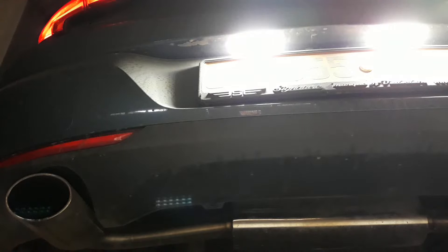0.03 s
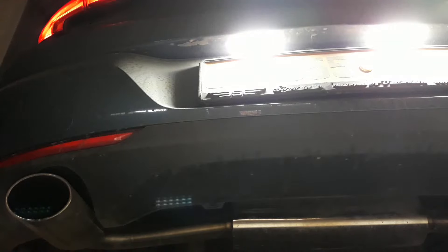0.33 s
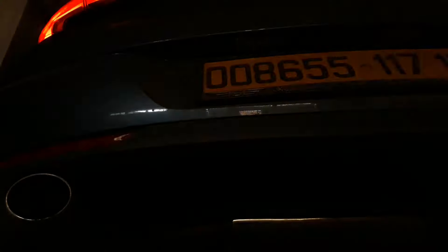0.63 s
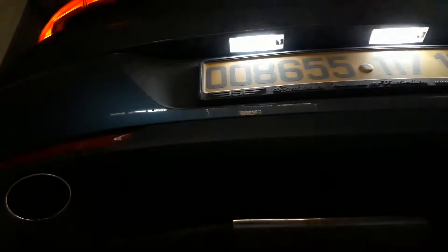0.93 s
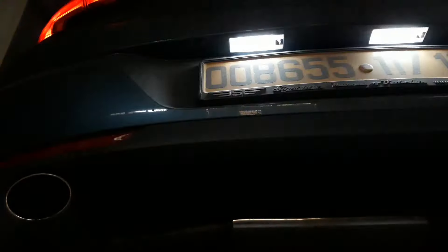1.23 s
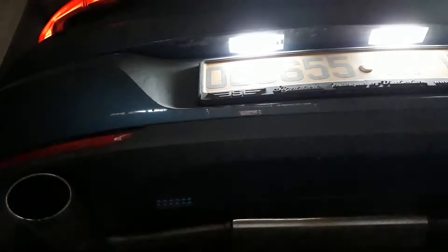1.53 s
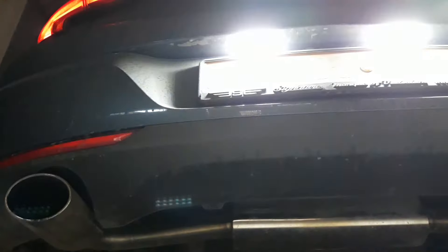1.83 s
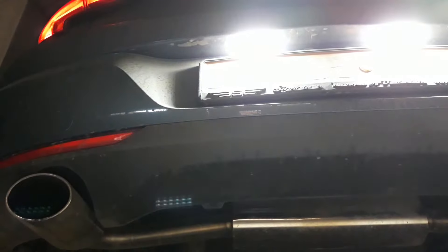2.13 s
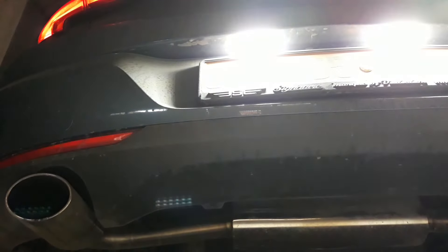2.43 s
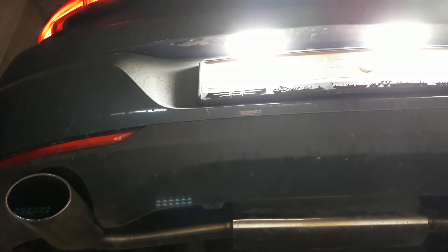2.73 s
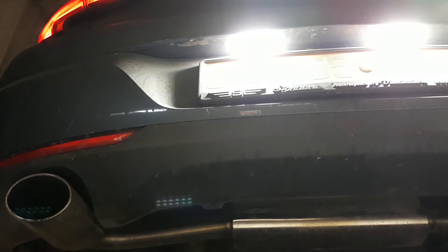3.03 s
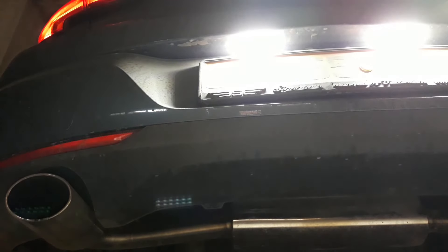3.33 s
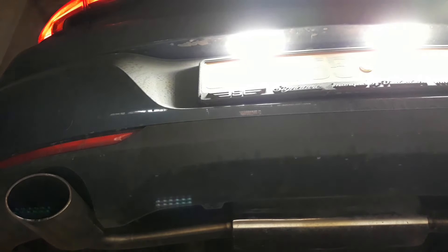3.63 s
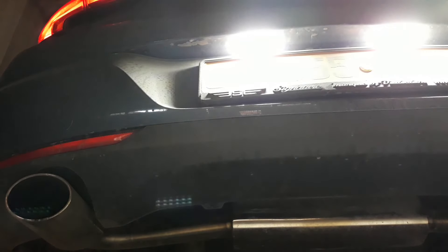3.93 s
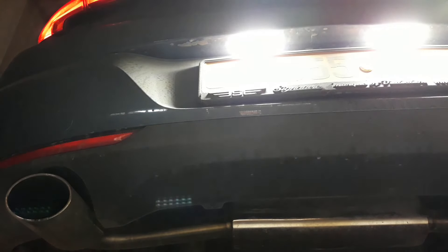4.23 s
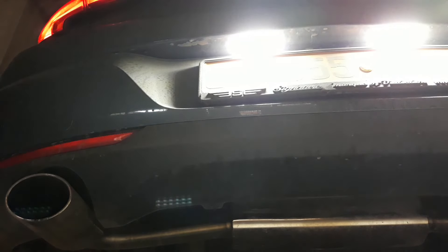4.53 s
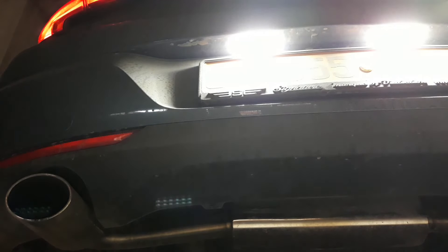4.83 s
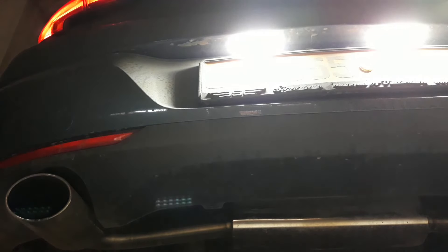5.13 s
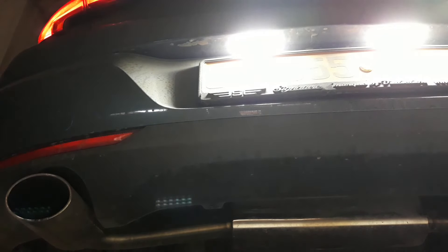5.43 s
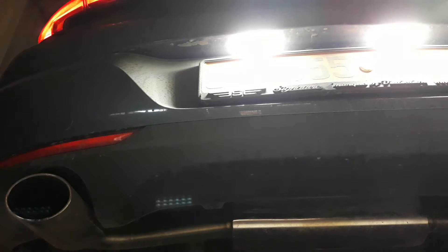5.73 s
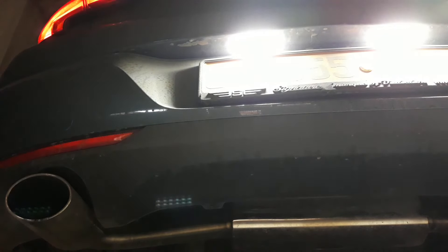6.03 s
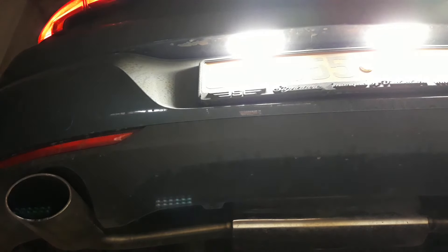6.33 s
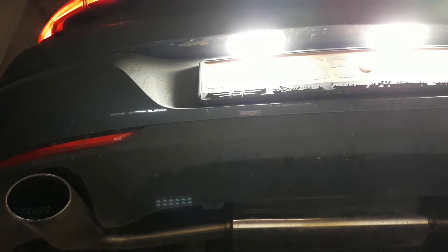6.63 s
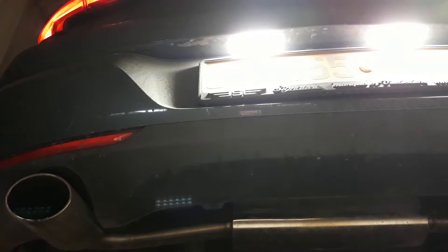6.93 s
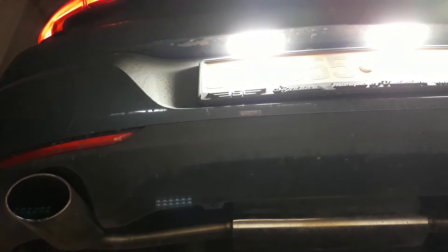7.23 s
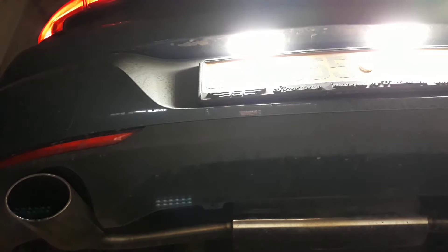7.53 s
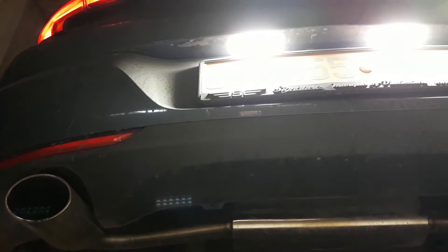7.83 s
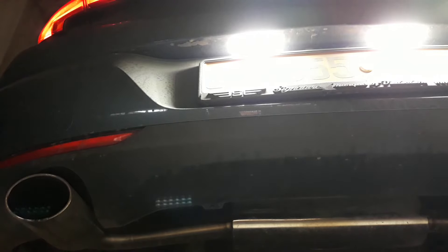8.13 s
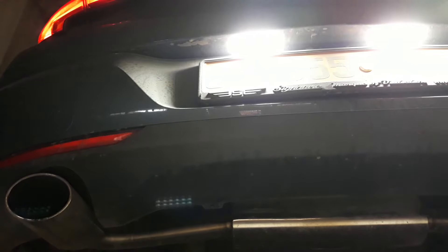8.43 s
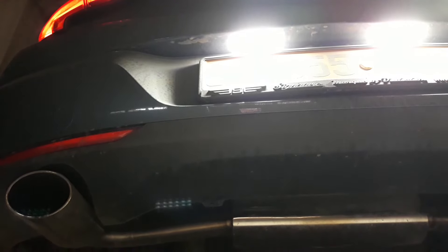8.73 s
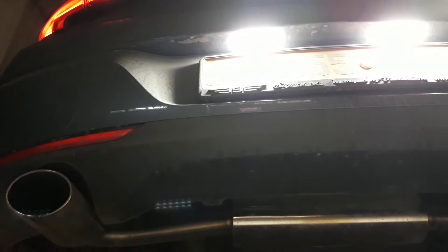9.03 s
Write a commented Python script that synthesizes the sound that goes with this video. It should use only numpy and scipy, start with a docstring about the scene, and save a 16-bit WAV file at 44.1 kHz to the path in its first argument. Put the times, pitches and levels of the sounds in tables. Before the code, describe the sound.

A faint, low outdoor hum opens the scene, heard from just behind a car's tailpipe. At about 0.6 seconds the starter engages with a clack, then grinds and whines through five quick cranking pulses. Around 1.4 seconds the cold four-cylinder engine catches with ragged, deep thumps and sharp spits of gas, and the starter spins away. A short, loud flare peaks between 1.6 and 2 seconds and falls back by about 2.4 seconds. The engine then holds a fast, low idle, the exhaust thumping and burbling over a soft rush of gas and light clatter. Faint, thin whistles come and go, mostly between 2 and 6 seconds. Small pops come from the pipe, the clearest near 3 and 5.8 seconds, with weaker ones around 7.5. The idle sinks very slightly and keeps running to the end, at about 9 seconds.

```python
"""Cold car start at night

A four-cylinder petrol engine outdoors, heard from just behind the tailpipe. The solenoid clacks,
the starter grinds through five compressions, the cylinders catch one by one and flare. A fast idle
then sinks slowly: every firing thumps the silencer, barks down the pipe and puffs out gas."""
import sys
import numpy as np
from scipy import signal
from scipy.fft import rfft, irfft
from scipy.io import wavfile
from scipy.ndimage import uniform_filter1d

SR = 44100
rng = np.random.default_rng(int(sys.argv[2]) if len(sys.argv) > 2 else 0)


def persist_wave(psi):
    """Save psi, clipped to +-1, as 16-bit WAV."""
    counts = np.round(np.clip(psi, -1, 1) * 32767).astype(np.int16)
    wavfile.write(sys.argv[1], SR, np.atleast_2d(counts).T)


N = 404838
T = np.arange(N) / SR
HZ = np.maximum(np.arange(16385) * SR / 32768, 1)  # filter frequency grid

# Compressions that load the starter. Each row: start in seconds, length in seconds, load in dB.
COMPRESSIONS = [(.83, .12, 3), (.975, .085, 5.5), (1.11, .075, 5.5), (1.218, .075, 7.5), (1.335, .075, 6.5)]
# Air pumped by the cranking pistons, then the first ragged firings.
# Each row: time in seconds, thump and bark in relative dB.
FIRST_PULSES = [(.69, -24, -45), (.905, -11.5, -27), (1.419, -11, -18.5), (1.46, 8, -7.5),
                (1.498, -5, -8.5), (1.536, -7, -24), (1.571, 5, 0), (1.605, 3, -4.5), (1.627, 0, -18),
                (1.660, 0, -1), (1.689, 2, -0.5), (1.723, 7, -11), (1.747, 3, -2.5), (1.771, 7, -1.5),
                (1.799, 12, 2), (1.822, 11, -2)]


def undb(db):
    """Decibels to gain."""
    return 10 ** (np.asarray(db) / 20)


def unit(x):
    """Scale to rms 1."""
    return x / np.sqrt(np.mean(x ** 2))


def ramp(start_s, rise_s):
    """Linear rise from 0 to 1, then held."""
    return np.clip((T - start_s) / rise_s, 0, 1)


def curves(rows, at_s=T):
    """Interpolate each column over the times in the first."""
    row_s, *columns = np.transpose(rows)
    return [np.interp(at_s, row_s, column) for column in columns]


def colour(points):
    """Gain over frequency from (Hz, dB) points, rolled off below the first."""
    hz, db = np.transpose(points)
    return undb(np.interp(np.log(HZ), np.log(hz), db)) * HZ ** 2 / (HZ ** 2 + (hz[0] / 2) ** 2)


def resonances(modes):
    """Gain over frequency of steep-sided (Hz, width Hz, dB) peaks."""
    return np.sqrt(sum((undb(db) / (1 + (2 * (HZ - hz) / width) ** 2)) ** 2 for hz, width, db in modes))


def ring(x, gain, delay_s=0):
    """Minimum-phase filter, plus a delay per frequency."""
    cepstrum = irfft(np.log(gain + 1e-6))
    half = len(cepstrum) // 2
    cepstrum[1:half] *= 2
    cepstrum[half + 1:] = 0
    lag_rad = 2 * np.pi * np.cumsum(delay_s * np.gradient(HZ))
    response = irfft(np.exp(rfft(cepstrum) - 1j * lag_rad))[:half]
    return signal.fftconvolve(x, response)[:N]


def walk(rate_hz):
    """Smooth random curve, rms 1."""
    step = max(int(SR / rate_hz), 1)
    held = np.repeat(rng.standard_normal(N // step + 1), step)[:N]
    return unit(uniform_filter1d(held, step))


def noise(gain, grit_db=0):
    """Coloured noise, rms 1; grit breaks it into uneven grains."""
    return unit(ring(rng.standard_normal(N) * undb(grit_db * walk(900)), gain))


def pulses(times_s, sizes):
    """One impulse per event."""
    return np.bincount(np.clip(times_s * SR, 0, N).astype(int), sizes, N + 1)[:N]


def bursts(rows, rise_s=0.0014):
    """Envelope of sudden, decaying blows."""
    return sum(undb(db) * ramp(s, rise_s) * np.exp(-np.abs(T - s) / decay_s) for s, db, decay_s in rows)


def swells(kicks, decay_s, rise_s=0.0012):
    """Envelope with a quick rise and a decay per kick."""
    t = T[:SR // 10]
    shape = (1 - np.exp(-(t / rise_s) ** 2)) * np.exp(-t / decay_s)
    return signal.fftconvolve(kicks, shape)[:N]


def night_hum(level_db=-41):
    """Low outdoor background, wavering slightly."""
    # Each row: frequency in Hz, gain in dB.
    spectrum = [(18, -53), (30, -23), (47, -12), (83, -4), (154, 0), (253, -5), (404, -2), (698, -3),
                (859, -5), (953, -4), (2370, -16), (5730, -48), (15000, -55)]
    return undb(level_db + 0.5 * walk(9.5)) * noise(colour(spectrum))


def solenoid():
    """The solenoid clicks; the pinion strikes and rebounds."""
    # Each row: start in seconds, level in dB, decay in seconds.
    clacks = [(.639, -22.5, 0.066), (.665, -14.5, 0.027), (.675, -19, 0.013)]
    # Each row: frequency in Hz, gain in dB.
    spectrum = [(59, -49), (100, -8), (279, -12.5), (391, -1), (513, -20), (780, 1), (983, -7), (1190, -1),
                (1430, -21), (1590, -7.5), (15000, -39)]
    return bursts(clacks) * noise(colour(spectrum), grit_db=1.0)


def mesh_pitch(on_s, free_s, free_rise_s, start_hz=750, top_hz=3750, spin_up_s=0.18, free_rise_hz=1500):
    """Gear-mesh Hz: the motor spins up, sags late in each compression and races once freed."""
    sag_share, sag_width_s = 0.17, 0.032
    cranking_hz = top_hz - (top_hz - start_hz) * np.exp(-np.maximum(T - on_s, 0) / spin_up_s)
    racing_hz = free_rise_hz * (1 - np.exp(-np.maximum(T - free_s, 0) / free_rise_s))
    squeeze = sum(np.exp(-((T - start_s - 0.73 * length_s) / sag_width_s) ** 2)
                  for start_s, length_s, _ in COMPRESSIONS)
    return (cranking_hz + racing_hz) * (1 - sag_share * squeeze)


def starter(on_s=0.66, free_s=1.43, free_rise_s=0.11, off_s=1.58, level_db=-25, run_down_db_per_s=110):
    """Gear teeth grind, ring the housing and whine; each compression loads them."""
    # Each row: frequency in Hz, gain in dB.
    grind_spectrum = [(88, -76.5), (150, -49), (294, -15.5), (378, -6), (450, -10), (525, -12), (589, -1),
                      (918, -6), (1180, -1), (1380, -9.5), (2550, -14.5), (3090, -19), (4290, -25),
                      (8580, -34.5), (15000, -46)]
    # Each row: frequency in Hz, width in Hz, gain in dB.
    housing_modes = [(586, 37, -6), (765, 37, 0.5), (1008, 14, 6), (1124, 40, -3), (1230, 45, -2),
                     (2050, 55, -6)]
    load_db = sum(db * ramp(start_s, 0.0052) * np.clip((start_s + length_s - T) / 0.017, 0, 1)
                  for start_s, length_s, db in COMPRESSIONS)
    relief_db = -3 * ramp(free_s, free_rise_s)
    grind = undb(-0.5) * noise(colour(grind_spectrum), grit_db=0.5)
    housing = undb(-6) * noise(resonances(housing_modes))
    screech = undb(-27 + load_db / 2) * noise(resonances([(8500, 1200, 0), (12000, 4600, -15)]))
    gears = undb(load_db + relief_db) * (grind + housing + screech)

    mesh_hz = mesh_pitch(on_s, free_s, free_rise_s)
    wobble = 1 + 0.012 * (walk(600) + walk(1500))
    phase = 2 * np.pi * np.cumsum(mesh_hz * wobble) / SR
    tone = np.sin(phase) + undb(-19) * np.sin(3 * phase)
    radiation_db = np.interp(mesh_hz, [3150, 3550], [0, -6])  # the housing radiates less at high pitch
    flutter_db = 5 * walk(200)
    whine = undb(-9.5 + radiation_db + load_db / 3 + flutter_db) * tone

    inrush_db = 7 * np.exp(-np.maximum(T - on_s, 0) / 0.086)
    run_down_db = run_down_db_per_s * np.maximum(T - off_s, 0)
    return ramp(on_s, 0.022) * undb(level_db + inrush_db - run_down_db) * (gears + whine)


def boom(boom_hz=55, width_hz=12, peak_db=-11):
    """The slow first strokes swing the whole silencer; cranking shakes it."""
    first_s, thump_db, _ = np.transpose(FIRST_PULSES)
    swings = ring(pulses(first_s, undb(thump_db)), resonances([(boom_hz, width_hz, 0), (75, 60, -17)]))
    cranking = np.interp(T, [0.66, 0.92, 1.85, 2.05], [0, 1, 1, 0])
    rumble_db = -36 + 15 * ramp(1.4, 0.085)  # rises as the engine catches
    rumble = undb(rumble_db) * cranking * noise(resonances([(58.3, 27, 4.0), (171, 300, -10.5)]))
    return rumble - undb(peak_db) * swings / np.abs(swings).max()


def firings(running_s=1.8435, jitter_ms=0.15, scatter_db=1.0):
    """Time and relative burn strength of each firing of the running engine."""
    # The idle governor hunts, then eases off. Each row: time in seconds, firings per second.
    firing_rate = [(1.85, 42.223), (2.007, 48.866), (2.433, 50.35), (2.702, 48.515), (2.93, 50.084),
                   (3.157, 48.653), (3.507, 48.699), (4.081, 47.318), (4.466, 47.875), (4.658, 46.737),
                   (4.822, 47.211), (6.676, 46.242), (7.56, 46.207), (7.742, 45.543), (9.18, 45.658)]
    # Cylinders in firing order. Each row: level in dB, lateness in ms.
    cylinders = [(0, .25), (-.5, -.1), (1.3, 0), (-.8, -.18)]
    # Misfires and hard burns of the cold engine. Each row: time in seconds, strength in relative dB.
    odd_burns = [(2.09, -6.5), (2.53, -1.5), (2.68, 4), (2.76, -6), (3.32, 1.5), (4.09, -2), (5.55, 3.5),
                 (6.65, -19.5), (6.67, 2.5)]
    count = np.cumsum(curves(firing_rate)[0]) / SR
    count -= np.interp(running_s, T, count)
    index = np.arange(int(count[-1]) + 1)
    jitter, scatter = rng.standard_normal((len(index), 2)).T
    cylinder_db, late_ms = np.array(cylinders)[index % len(cylinders)].T
    firing_s = np.interp(index, count, T) + (late_ms + jitter_ms * jitter) / 1000
    burn_db = cylinder_db + scatter_db * scatter
    for time_s, db in odd_burns:
        burn_db[np.argmin(np.abs(firing_s - time_s))] = db
    return firing_s, burn_db


def warming_resonator(kicks, firing_s, modes, delay_s=0, warmth_per_s=0.065):
    """Modes whose balance shifts as the exhaust heats; unit firings give an rms near 1."""
    hz, width_hz, cold_db, warm_db = np.transpose(modes)
    warmth = np.clip(0.026 + warmth_per_s * T, 0, 1)
    radiation = HZ ** 2 / (HZ ** 2 + 22 ** 2)  # an open pipe radiates no steady pressure
    unit_firings = pulses(firing_s, np.ones(len(firing_s)))
    out = 0
    for share, db in [(1 - warmth, cold_db), (warmth, warm_db)]:
        gain = radiation * resonances(zip(hz, width_hz, db))
        out = out + share * ring(kicks, gain, delay_s) / ring(unit_firings, gain).std()
    return out


def silencer(firing_s, level_db, lag_s=0.0027, scatter_db=0.8):
    """Each exhaust pulse thumps the silencer's low modes."""
    # Each row: frequency in Hz, width in Hz, cold gain in dB, warm gain in dB.
    modes = [(55.2, 8.2, 6.5, 4), (89.8, 22, -1, 2.5), (114, 18, -2.5, 7.5), (133.5, 14.7, -10.5, 0.5),
             (188.4, 15, -17.5, -9.5)]
    first_s, first_db, _ = np.transpose(FIRST_PULSES)
    thump_db = level_db + scatter_db * rng.standard_normal(len(firing_s))
    thumps = pulses(np.r_[first_s, firing_s + lag_s], undb(np.r_[first_db - 19, thump_db]))
    return warming_resonator(thumps, firing_s, modes)


def tailpipe(firing_s, level_db, turbulence_db=-39, sweep_s=0.006, upper_hz=390, waver_db=1.3):
    """Each pulse barks down the pipe; the low notes come out last and the upper ones waver."""
    # Each row: frequency in Hz, width in Hz, cold gain in dB, warm gain in dB.
    modes = [(285.8, 32, -4.5, -2.5), (319.5, 36.7, 3.5, 1.5), (378, 54, -5, -3.5),
             (436.6, 75.3, 1.5, -4.5), (480.8, 19, -2.5, -3.5), (596.4, 51, -13.5, -22.5),
             (711, 120, -29, -23.5)]
    first_s, _, first_db = np.transpose(FIRST_PULSES)
    barks = pulses(np.r_[first_s, firing_s], undb(np.r_[first_db - 12, level_db]))
    # gas tumbles after each pulse, so no two barks ring alike
    wake = signal.fftconvolve(barks, np.exp(-T[:SR // 20] / 0.006))[:N]
    turbulence = undb(turbulence_db) * wake * rng.standard_normal(N)
    delay_s = sweep_s * np.clip((640 - HZ) / 330, 0, 1)
    pipe = warming_resonator(barks + turbulence, firing_s, modes, delay_s)
    upper = signal.sosfiltfilt(signal.butter(4, upper_hz, "high", fs=SR, output="sos"), pipe)
    return pipe + (undb(waver_db * walk(14)) - 1) * upper


def exhaust(firing_s, burn_db):
    """Firings drive the pipe and the silencer, which evens out strong and weak burns."""
    # Effort through flare, dip and idle. Each row: time in seconds, thump in dB, bark in dB.
    effort = [(1.85, -7.5, -12), (1.98, -18, -12), (2.15, -16, -9.5), (2.3, -20.5, -14.5),
              (2.55, -21.5, -14.5), (2.7, -19.5, -13.5), (3.4, -18, -13), (6.7, -19, -14),
              (8.2, -16.5, -13), (9.18, -16.5, -14)]
    thump_db, bark_db = curves(effort, firing_s)
    thumps = silencer(firing_s, thump_db + 0.25 * burn_db)
    return tailpipe(firing_s, bark_db + burn_db) - thumps


def flare(peak_db, close_s, peak_s=1.664, shut_s=2.1, swell_db_per_s=27, fade_db_per_s=19.5):
    """Start-up flare in dB against idle: swells, fades and ends as the throttle shuts."""
    throttle = 1 - ramp(shut_s, close_s)
    below_peak_db = np.maximum(swell_db_per_s * (peak_s - T), fade_db_per_s * (T - peak_s))
    return throttle * (peak_db - below_peak_db)


def gas_rush(firing_s, burn_db, idle_db=-30.5, lag_s=0.001, scatter_db=1.5):
    """Turbulence puffs out with each firing, harder after a hard burn, over a steadier clatter."""
    # Each row of both spectra: frequency in Hz, gain in dB.
    rush_spectrum = [(250, -14.5), (440, 4.5), (600, -7.5), (780, -3), (890, -22), (1020, -4.5), (1270, -8),
                     (1500, -16), (2400, -28), (4000, -47)]
    clatter_spectrum = [(700, 4), (900, -4.5), (1100, 3.5), (1500, -0.5), (2500, -3), (3000, -10),
                        (4000, -12.5), (5500, -24.5), (7000, -40.5)]
    first_s, _, first_db = np.transpose(FIRST_PULSES)
    puff_db = burn_db / 2 + scatter_db * rng.standard_normal(len(firing_s))
    kicks = pulses(np.r_[first_s, firing_s] + lag_s, undb(np.r_[first_db, puff_db]))
    puffs = unit(swells(kicks, decay_s=0.008))
    rush = unit(0.38 + puffs / 2) * noise(colour(rush_spectrum), grit_db=-2.0)
    clatter = undb(-4) * (1.07 + 0.069 * puffs) * noise(colour(clatter_spectrum), grit_db=0.5)
    return undb(idle_db + flare(peak_db=11.5, close_s=0.3)) * (rush + clatter)


def gas_hiss(idle_db=-52):
    """Escaping gas hisses, with sharp spits as the engine catches."""
    # Each row: start in seconds, level in dB, decay in seconds.
    spits = [(1.618, -29, 0.0081), (1.655, -37, .008), (1.682, -27, 0.0048), (1.746, -41, .008)]
    # Each row: frequency in Hz, gain in dB.
    spectrum = [(3000, -2.5), (5000, 0), (6600, -6.5), (7700, -3.5), (8700, 1), (10200, -10), (11800, -2.5),
                (15500, -14.5)]
    envelope = undb(idle_db + flare(peak_db=15, close_s=0.078)) + bursts(spits)
    return envelope * noise(colour(spectrum), grit_db=-0.5)


def pops(firing_s, burn_db, tick_db=-28, scatter_db=2.0):
    """Gas bursts ring the pipe's upper notes: a tick per firing, now and then a loud pop."""
    # Pops at the pipe mouth. Each row: time in seconds, level in relative dB.
    loud_pops = [(2.949, -6), (3.029, -15), (3.172, -14), (3.313, -14), (5.822, -8), (7.312, -13),
                 (7.636, -17)]
    # Each row: frequency in Hz, width in Hz, gain in dB.
    modes = [(680, 230, 10.5), (1200, 520, -0.5), (2000, 1400, -21)]
    ticks = pulses(firing_s, undb(tick_db + burn_db + scatter_db * rng.standard_normal(len(firing_s))))
    pop_s, pop_db = np.transpose(loud_pops)
    kicks = ticks + pulses(pop_s, undb(pop_db - 4))
    return swells(kicks, decay_s=0.0042) * noise(resonances(modes))


def whistles(flutter_db=2.5):
    """Thin wavering tones that swell and fade."""
    # Each row: start in seconds, end in seconds, pitch in Hz, level in dB.
    tones = [(1.95, 2.35, 1039, -30), (1.95, 2.35, 1556, -35), (3.15, 3.95, 1195, -30.5),
             (2.7, 3.8, 1534, -43), (3.0, 3.75, 1707, -43), (3.0, 4.6, 1020, -41), (4.05, 4.65, 2440, -44),
             (5.55, 5.95, 1965, -43), (2.2, 11, 3051, -53)]
    out = 0
    for start_s, end_s, hz, db in tones:
        swell = np.sqrt(np.abs(np.sin(np.pi * ramp(start_s, end_s - start_s))))
        waver_hz = 4 * (walk(60) + 2 * walk(300))
        tone = np.sin(2 * np.pi * np.cumsum(hz + waver_hz) / SR)
        out = out + swell * undb(db + flutter_db * walk(70)) * tone
    return out


def scene():
    """Starter, exhaust and gas over the hum of the night; mono."""
    firing_s, burn_db = firings()
    caught = ramp(1.42, 0.014)  # gas noise begins at the first ragged firing
    mix = night_hum() + starter() + solenoid() + boom() + exhaust(firing_s, burn_db)
    mix += caught * (gas_rush(firing_s, burn_db) + gas_hiss())
    mix += pops(firing_s, burn_db) + whistles()
    return mix[None]


def record(dry, top_hz=15700):
    """The microphone rounds the highest peaks; a steep low-pass cuts the top."""
    rounded = dry / (1 + dry ** 8) ** (1 / 8)
    return signal.sosfilt(signal.ellip(10, 0.2, 80, top_hz, fs=SR, output="sos"), rounded)


dry = scene()
out = record(dry)
persist_wave(out)
```